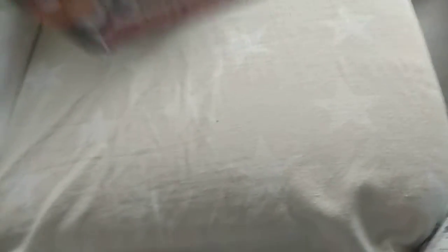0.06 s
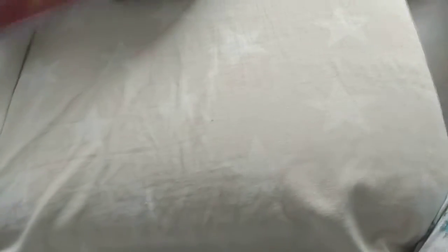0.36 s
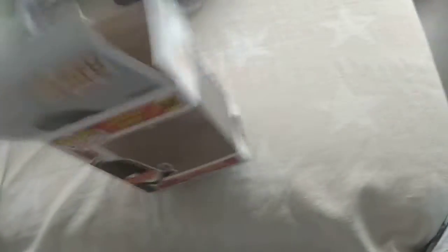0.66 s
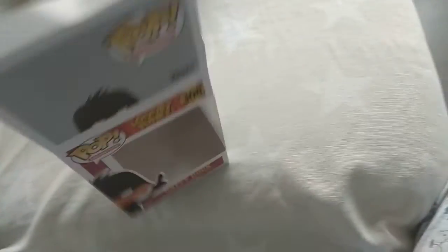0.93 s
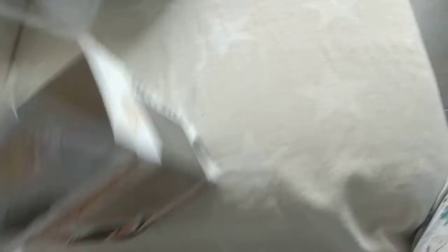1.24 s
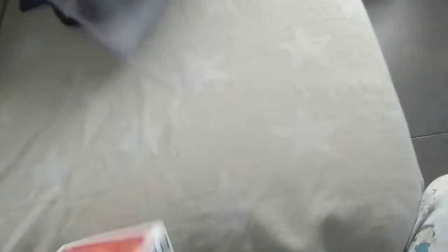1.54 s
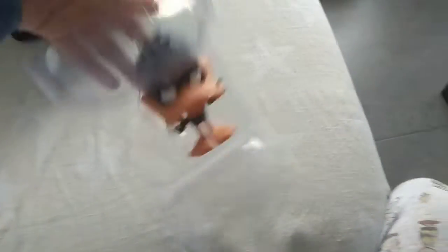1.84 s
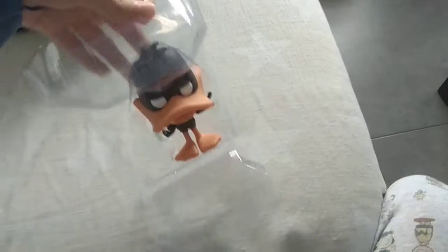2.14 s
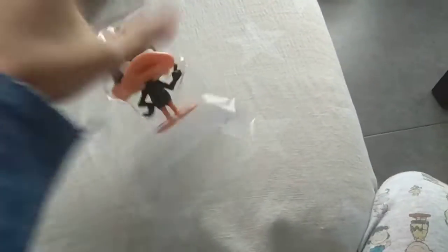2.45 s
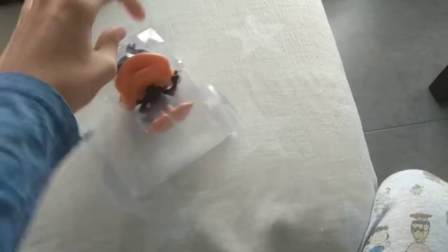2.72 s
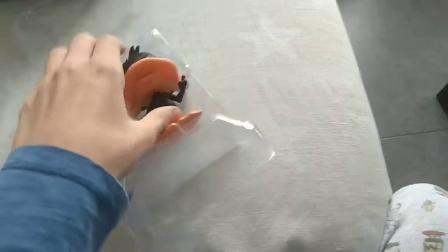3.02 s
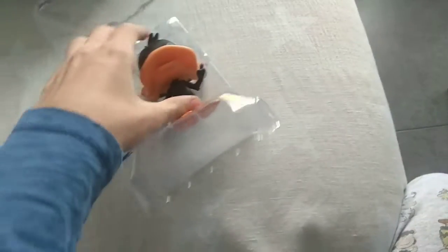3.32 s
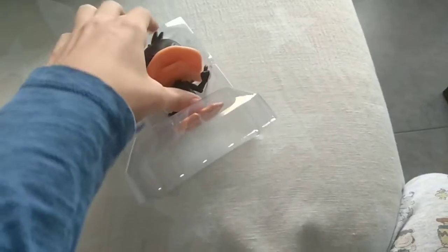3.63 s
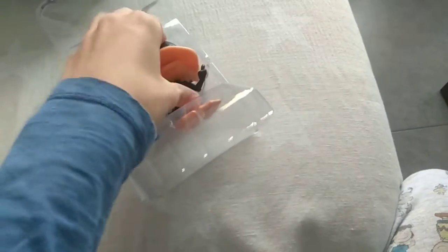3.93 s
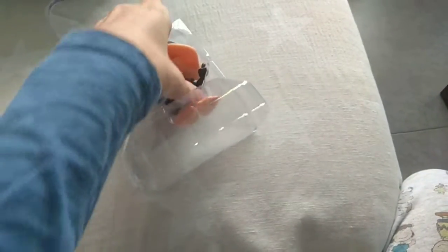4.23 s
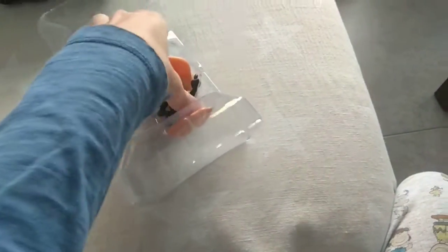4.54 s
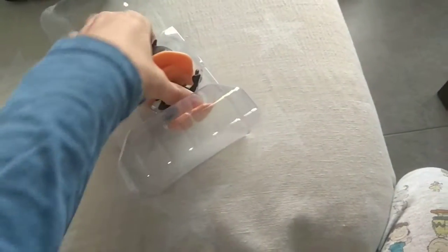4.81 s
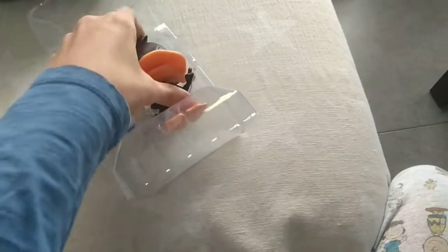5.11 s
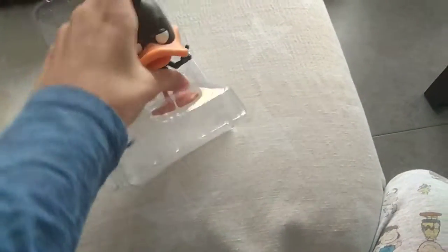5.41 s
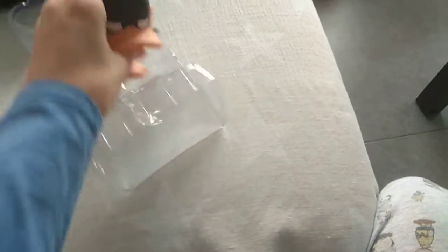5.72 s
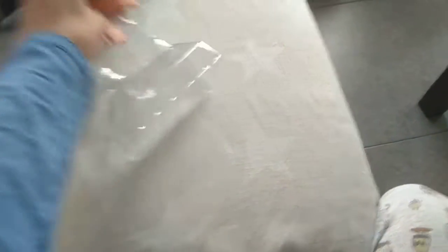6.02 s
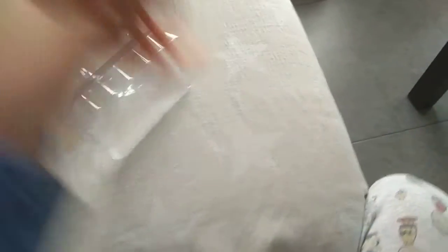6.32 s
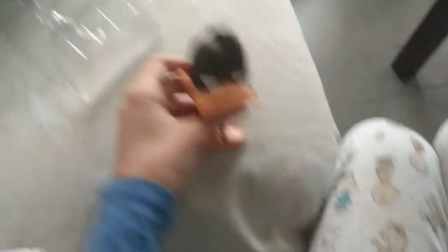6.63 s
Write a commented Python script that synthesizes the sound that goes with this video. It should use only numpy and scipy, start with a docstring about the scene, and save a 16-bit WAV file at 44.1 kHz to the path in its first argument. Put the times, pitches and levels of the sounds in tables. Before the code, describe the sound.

A small cardboard box is handled and opened with a quick run of hollow knocks, scrapes and flap rasps. Its insert slides out with a brief, thin chafing squeak. Then a hand rubs and flexes a thin plastic tray, making quieter crinkles and dry clicks with a few sharp snaps as it works a toy figure loose. The sounds are close, in stereo, in a small quiet room.

```python
"""Knocks, rasps and slides come first: a small cardboard box is opened and its insert chafes out.
Then a hand rubs, flexes and snaps a thin plastic tray while it works a toy figure loose.
Stick-slip friction makes the hiss and the rasps; impacts and buckling excite the damped modes
of panels and shells. A small room answers faintly, and two close microphones hear it in stereo."""
import sys
import numpy as np
from scipy import signal
from scipy.fft import rfft, irfft, next_fast_len
from scipy.io import wavfile
from scipy.ndimage import uniform_filter1d, map_coordinates

SR = 44100
rng = np.random.default_rng(int(sys.argv[2]) if len(sys.argv) > 2 else 0)


def wav_record(signal):
    """Record a signal, one row per channel, as 16-bit PCM in the file named by sys.argv[1]."""
    frames = np.transpose(np.atleast_2d(signal))
    bounded = np.clip(frames, -1, 1)
    # unit amplitude maps onto the largest positive 16-bit level
    quanta = np.round(bounded * 32767).astype(np.int16)
    wavfile.write(sys.argv[1], SR, quanta)


N = 293706
T = np.arange(SR // 4) / SR  # time axis of one short event, in seconds

# Slides on the card. Each row: time of full speed in seconds, body and hiss levels in dB,
# then attack, hold and release in seconds.
CARD_STROKES = [(0.02, -33.5, -46.5, 0.064, 0.018, 0.04), (0.07, -33.5, -41, .05, .01, 0.028),
                (0.14, -32, -37, .12, 0.044, .04), (0.23, -28.5, -35.5, 0.052, 0.04, 0.14),
                (0.3395, -27, -31, .008, 0.025, 0.0704), (0.425, -23, -35.5, 0.015, 0.026, 0.091),
                (0.56, -25, -28.5, 0.061, 0.058, 0.033), (0.609, -24.5, -24, 0.021, 0.065, 0.01),
                (0.7, -31, -37.5, .03, 0.032, 0.029), (0.752, -19, -27.5, 0.016, 0.015, 0.076),
                (0.86, -25, -37, 0.054, 0.019, 0.043), (1.025, -42, -42.5, 0.046, 0.015, 0.055),
                (1.125, -52, -37, 0.015, 0.0051, 0.015), (1.175, -38, -36.5, 0.08, 0.024, 0.042),
                (1.315, -50.5, -57, 0.31, 0.034, 0.047), (1.4, -61, -57.5, 0.029, 0.0059, 0.22)]
# Spectra of the card's sheet, contact, flap edge and rumble. Each row: frequency in Hz, level in dB.
CARD_BODY = [(200, -26), (380, 0), (550, 2), (800, 2), (1050, 5.5), (1300, 0), (1600, -4), (2300, -4.5),
             (3200, -12), (4800, -14), (8000, -35.5)]
CARD_HISS = [(2500, -19), (4800, 2), (6500, 0), (8500, 7), (10500, 2.5), (13000, 1.5), (16000, -14.5)]
CARD_EDGE = [(300, -24), (700, -6.5), (1300, 2.5), (1900, 7), (2600, 3.5), (3600, -5.5), (5000, -10.5),
             (8000, -23)]
BOX_RUMBLE = [(30, -6), (70, -19), (100, -17), (130, -4.5), (190, 5.5), (260, 2.5), (350, 2), (600, -25)]
# Finger knocks. Each row: start in seconds, level in dB, pitch in Hz, relative edge and thump in dB.
KNOCKS = [(0.03, -23, 1090, -20, -12.5), (0.054, -25, 900, -19, -12.5), (0.097, -15.5, 868, -40, -18.5),
          (0.1895, -10.5, 1314, -19.5, -14), (0.228, -10, 696, -20, -18.5), (0.338, -19.5, 684, -8, -10),
          (0.353, -19, 412, -25, 1), (0.3575, -11.5, 1230, -8.5, -9.5), (0.4165, -18, 620, -13.5, -16.5),
          (0.423, -14, 500, -26, -9), (0.441, -15.5, 480, -16.5, -10.5), (0.4525, -12, 875, -16, -5.5),
          (0.5135, -12, 1430, -24.5, -15.5), (0.5985, -5.5, 2000, -21.5, -20),
          (0.6803, -5.5, 1760, -14, -14.5), (0.6845, -10, 1308, -17.5, -12.5), (0.731, -16.5, 750, -16, -2),
          (0.772, -15, 760, -25, -11), (0.8597, -10, 1790, -5, -13.5), (0.9095, -20, 1330, -7.5, -19.5),
          (0.916, -12, 1290, -6, -26.5), (1.05, -34.5, 1030, -24, -22), (1.071, -22, 2060, -16, -36.5),
          (1.083, -27, 2120, -8.5, -31.5), (1.114, -27, 2260, -21.5, -41), (1.31, -33, 745, -4, -28),
          (1.332, -32.5, 740, -28, -24), (1.3627, -30, 1790, 0, -8), (1.367, -35.5, 2320, -18, -9),
          (1.441, -34.5, 1730, -19, -13)]
# Modes of the box. Each row: frequency in Hz, level in dB, 60 dB decay time in seconds.
BOX_MODES = [(127, -2.5, 0.11), (173.83, 0.5, 0.13), (251, 4.5, 0.098), (304, 5, 0.071), (500, -2.5, 0.051),
             (609, -8.5, 0.043)]
# The flap catching. Each row: start in seconds, level in dB, relative hiss in dB, length in seconds.
FLAP_RASPS = [(0.019, -25.5, -7.5, .003), (0.025, -27.5, -1.5, 0.0077), (0.174, -19.5, -15, 0.0057),
              (0.2235, -8.5, -20, 0.012), (0.2515, -26, 9, 0.0053), (0.358, -4, -18.5, 0.0027),
              (0.4163, -15, 2.5, 0.0043), (0.4222, -18, 5, 0.003), (0.44, -16.5, -4.5, .003),
              (0.604, -15.5, 0.5, 0.0061), (0.636, -18.5, 1.5, 0.0066), (0.659, -15, -1, 0.0071),
              (0.749, -9.5, -1.5, 0.0034), (0.754, -9.5, -0.5, 0.0049), (0.7635, -11.5, 2.5, 0.0092),
              (0.7847, -10, -0.5, 0.0065), (0.816, -22, 3, 0.0086), (0.8624, -13.5, 1, 0.00285),
              (0.8715, -6.5, -5.5, 0.00784), (0.8815, -9, -1, 0.0139), (0.909, -10, -2, 0.0064),
              (0.9162, -6, 0, 0.00575), (1.215, -20.5, -9, 0.0067)]
# The box lies to the right. Each row: frequency in Hz, left minus right in dB.
BOX_BALANCE = [(100, -4.5), (500, -4), (1200, -2), (2400, -0.5), (5000, -2.5), (9000, -3), (15000, -2.5)]

def box():
    """Friction and impact drive a cardboard shell: slides, knocks, a rasping flap, a chafing insert."""
    slides = rubbing(CARD_STROKES, CARD_BODY, CARD_HISS, body_db=1.5, hiss_db=-0.5,
                     grain_db=3.5, modes_db=3, judder_db=3, judder_rate=180)
    knocks = blows(KNOCKS, BOX_MODES, CARD_BODY, CARD_HISS, delay_s=0.0007, hardening=0.21,
                   panel_db=-5.5, panel_cycles=19, flutter=0.73, flutter_t60=0.079,
                   clack_db=-3, clack_t60=0.028, crack_db=-6, crack_t60=0.015,
                   click_db=-9, wall_db=-12.5, thump_db=-4)
    slides += fizz()
    flap = rasps(FLAP_RASPS, CARD_EDGE, CARD_HISS, body_db=-10, hiss_db=-5.5, wall_db=5,
                 rise_s=0.0007, grain_db=2.5)
    chafe = insert()
    bed = slow_fade(start_s=0, end_s=1.45, fall_db_per_s=4.5)
    rumble = sway(CARD_STROKES, bed, BOX_RUMBLE, rub_db=-8.5, bed_db=-54, modes_db=1)
    return delayed(tilted(slides + knocks + chafe + rumble + flap, BOX_BALANCE), lag_s=0.0003)

# The insert leaving the box. Each row: time in seconds, level in dB, pitch in Hz.
INSERT_PATH = [(0.93, -39.5, 1930), (0.948, -49.5, 1940), (1.028, -47.5, 2076), (1.081, -35, 2180),
               (1.095, -48, 2250), (1.125, -33.5, 2400), (1.149, -40, 2316), (1.215, -28.5, 2297),
               (1.245, -71, 2193)]
# Spectrum of its chafing. Each row: frequency in Hz, level in dB.
INSERT_SPECTRUM = [(1200, -36), (1750, -3.5), (2000, -7), (2280, 0), (2480, -9.5), (2750, -6),
                   (3200, -15.5), (4500, -23.5)]

def insert(chafe_db=-0.5, sing_db=-5.5, width_hz=520):
    """Stick-slip on the box wall excites a narrow resonance that shifts as the insert slides."""
    times, _, pitch = np.transpose(INSERT_PATH)
    phase = 2 * np.pi * np.cumsum(np.interp(np.arange(N) / SR, times, pitch)) / SR
    sing = unit(wobble(width_hz) * np.cos(phase) + wobble(width_hz) * np.sin(phase))
    chafe = noise(INSERT_SPECTRUM, N, modes_db=6.5)
    judder = unit(amp(2.9 * wobble(140)))
    return level(INSERT_PATH) * judder * (amp(chafe_db) * chafe + amp(sing_db) * sing)

# Spectrum of a fast slide. Each row: frequency in Hz, level in dB.
CARD_FIZZ = [(5000, -35.5), (8000, -4), (10500, 5.5), (15000, 2), (16000, -15)]

def fizz(fizz_db=-20):
    """Friction noise brightens with sliding speed: the top treble grows as its square."""
    speed = stroke_gain(CARD_STROKES, column=2)
    return amp(fizz_db) * (speed / speed.max()) ** 2 * noise(CARD_FIZZ, N, grain_db=2, modes_db=2)

# Skin and figure sliding on the tray. Each row: time of full speed in seconds, body and hiss
# levels in dB, then attack, hold and release in seconds.
TRAY_STROKES = [(1.45, -69, -56, .1, 0.14, .1), (1.635, -49.5, -43, 0.0214, 0.015, 0.02),
                (1.715, -54.5, -47, 0.09, 0.051, 0.019), (1.998, -49.5, -44, 0.018, 0.015, 0.21),
                (2.338, -49.5, -42.5, 0.045, 0.0203, 0.04), (2.478, -36, -38, 0.026, 0.0155, 0.086),
                (2.54, -51, -48, .04, 0.078, 0.35), (2.665, -34, -33, 0.019, 0.0112, 0.072),
                (2.74, -41.5, -34.5, 0.047, 0.0045, 0.062), (2.845, -37, -33.5, 0.025, 0.016, 0.079),
                (3.115, -60, -50, 0.081, .012, 0.11), (3.19, -50.5, -47, 0.12, 0.08, 0.045),
                (3.405, -49.5, -44.5, 0.025, 0.0078, 0.036), (3.475, -50.5, -45.5, 0.087, 0.019, 0.0255),
                (3.595, -47.5, -44.5, 0.07, 0.067, 0.087), (3.75, -48.5, -47.5, 0.091, 0.019, 0.087),
                (3.937, -53.5, -45.5, 0.025, 0.012, 0.037), (3.985, -55, -47, 0.049, 0.0081, .05),
                (4.06, -57.5, -53, 0.112, 0.0296, .1), (4.165, -50, -44.5, 0.091, 0.016, 0.071),
                (4.34, -53.5, -52, 0.031, 0.0085, 0.058), (4.495, -66.5, -61, 0.027, 0.017, 0.115),
                (4.65, -71, -81, 0.044, 0.0364, .05), (4.79, -65, -65, .05, 0.025, 0.09),
                (4.91, -63.5, -67.5, 0.023, 0.018, 0.071), (4.728, -51, -45.5, 0.012, 0.0124, 0.055),
                (4.985, -53, -48.5, 0.037, 0.01, 0.071), (5.245, -49, -60.5, 0.022, 0.0054, 0.083),
                (5.39, -39.5, -36.5, 0.187, 0.045, 0.093), (5.565, -45.5, -42, 0.061, 0.0094, 0.055),
                (5.705, -46.5, -46.5, 0.075, 0.02, 0.106), (5.85, -41, -35.5, 0.0437, 0.0688, 0.055),
                (6.02, -43.5, -41, 0.037, 0.06, 0.1275)]
# Spectra of the tray's sheet, contact and rumble. Each row: frequency in Hz, level in dB.
TRAY_BODY = [(70, -38), (200, -24), (380, -7), (530, -6.5), (700, 2.5), (1000, 0), (1400, 2.5), (1900, 1.5),
             (2600, -2.5), (3400, -7.5), (4800, -16), (8000, -59)]
TRAY_HISS = [(2500, -6), (4800, -3.5), (6500, -3), (8500, 1), (11500, 3), (13500, -3.5), (16000, -7)]
TRAY_RUMBLE = [(30, -8), (80, -40.5), (120, -5.5), (170, 2.5), (215, 0.5), (275, -3), (380, 0.5),
               (600, -29)]
# Buckles and taps. Each row: start in seconds, level in dB, pitch in Hz, relative edge and thump in dB.
SNAPS = [(1.627, -42, 1360, 3.5, -5), (1.649, -35, 649, -3, -6), (1.708, -31.5, 510, -18, -3.5),
         (1.737, -39, 1200, -3, -1), (1.756, -35.5, 776, 0, -13), (1.799, -34.5, 528, -36, -14),
         (1.993, -31, 2000, -11.5, -6), (2.029, -36, 1130, 0, -5.5), (2.087, -48.5, 1610, 7, -6),
         (2.262, -32.5, 1040, -16, -22), (2.275, -40.5, 1000, -14, -32), (2.388, -22.5, 1300, -2.5, -11.5),
         (2.4555, -25.5, 1610, -9.5, -5), (2.4892, -12.5, 1400, -10.5, -10.5),
         (2.491, -12, 1840, -15, -24.5), (2.614, -29.5, 1800, -18, -32), (2.6635, -35, 988, 0, 0.5),
         (2.683, -29.5, 960, -22, -4.5), (2.841, -25, 1020, -9.5, -5.5), (2.923, -47.5, 1710, 0.5, -11),
         (3.0275, -33.5, 1530, -6, -10.5), (3.0823, -11, 950, -17, -21), (3.1142, -42, 1150, 5, -4),
         (3.228, -28, 755, -22, -7), (3.523, -41, 1370, -11, -22), (3.761, -39.5, 960, -5, -4),
         (3.778, -35.5, 980, -6, -13), (3.859, -32.5, 1390, -7, -37.5), (3.937, -41, 1200, -21, -2),
         (3.959, -49, 686, -9, 8), (4.061, -37.5, 1090, -7, -16), (4.309, -39, 730, -24, -9.5),
         (4.335, -41, 820, -14, -6), (4.491, -42, 1320, -34, -5.5), (4.552, -46, 773, -10.5, -25.5),
         (4.648, -41, 790, -32.5, -29), (4.692, -43.5, 814, -33, -17.5), (4.727, -35.5, 903, -19.5, -10.5),
         (4.796, -42.5, 780, -20, -9), (4.91, -37.5, 849, -21, -31), (4.9797, -35, 1260, -0.5, -21),
         (4.9962, -36.5, 1490, -6, -28), (4.9982, -36.5, 930, -3.5, -21), (5.186, -44.5, 900, -28, -4.5),
         (5.229, -35.5, 1310, -11, -9), (5.257, -36.5, 564, -20, -4), (5.359, -26.5, 850, -20, -10),
         (5.368, -31.5, 1400, -16, -22.5), (5.726, -34, 1890, -20, -7.5), (5.757, -42.5, 710, -17, 6),
         (5.767, -35, 1250, -14, -14.5), (5.8285, -22, 990, -20, -10), (5.834, -25.5, 1380, -11, -22),
         (6.069, -29, 1370, -26, -19), (6.078, -29.5, 860, -27, -11), (6.346, -42.5, 1075, -32, -10.5)]
# Crumpling. Each row: start in seconds, level in dB, relative hiss in dB, length in seconds.
CRUNCHES = [(2.362, -38.5, 10, 0.0038), (2.462, -32, 2, 0.0037), (2.467, -36, -1, 0.0088),
            (2.4765, -24.5, 3, 0.0056), (2.482, -48, 0, 0.0027), (2.488, -24.5, -3, 0.0096),
            (2.512, -25, -10, 0.0064), (2.519, -36.5, 4.5, 0.0054), (2.663, -40.5, 9.5, .008),
            (2.748, -42, 10.5, 0.0081), (2.846, -33, 5, 0.0066), (2.859, -39.5, 5, 0.012),
            (5.243, -41.5, 4.5, .004), (5.458, -44, 9, .004)]
# Modes of the tray and of the hollow round the figure.
# Each row: frequency in Hz, level in dB, 60 dB decay time in seconds.
TRAY_MODES = [(150.6, -2, 0.1), (202.8, -1, 0.086), (275.8, 5.5, 0.059), (345, 6, 0.02), (411.6, -1.5, 0.1)]
POCKET_MODES = [(996, 1.5, 0.022), (1290, -17, 0.055), (3769, 5.5, 0.031), (8710, -6.5, .012),
                (12030, -7.5, .012)]

def tray():
    """A thin plastic shell buckles in dry snaps, while friction excites its moulded hollow."""
    rubs = crinkle()
    rubs += rubbing(TRAY_STROKES, TRAY_BODY, TRAY_HISS, body_db=0, hiss_db=-3.5,
                    grain_db=4, modes_db=3.5, judder_db=2, judder_rate=220)
    snaps = blows(SNAPS, TRAY_MODES, TRAY_BODY, TRAY_HISS, delay_s=0.0008, hardening=0.34,
                  panel_db=-7, panel_cycles=6.5, flutter=0.33, flutter_t60=0.1,
                  clack_db=-8.5, clack_t60=0.011, crack_db=-2, crack_t60=0.009,
                  click_db=-6, wall_db=-14, thump_db=-3.5)
    span_s = (1.5, 6.2)
    hush = rustle(slow_fade(*span_s, fall_db_per_s=2))
    crunch = rasps(CRUNCHES, TRAY_BODY, TRAY_HISS, body_db=-4.5, hiss_db=-2.5, wall_db=10,
                   rise_s=0.0008, grain_db=1.5)
    bed = slow_fade(*span_s, fall_db_per_s=1.55)
    rumble = sway(TRAY_STROKES, bed, TRAY_RUMBLE, rub_db=-10, bed_db=-63.5, modes_db=3)
    pocket = resonate(rubs, POCKET_MODES, ring_db=-1)
    return delayed(pocket + snaps + crunch + hush + rumble, lag_s=0.00016)

def crinkle(dents_per_s=220, crinkle_db=4, spread_db=2.8, ring_cycles=9.7, tick_share=0.31):
    """Local buckling: under each stroke small dents flip at random, each with a ring and a tick."""
    track = np.zeros((2, N))
    tick = crest(noise(TRAY_HISS, len(T), grain_db=2.5) * fade(0.002))
    for when, pitch, size in rng.random((int(dents_per_s * N / SR), 3)):
        hz = 700 * 2 ** (2 * pitch)
        dent = np.sin(2 * np.pi * hz * T) * fade(ring_cycles / hz) * (1 - np.exp(-hz * T))
        gain = amp(spread_db * (min(-np.log(size), 3) - 1))
        add(track, when * N / SR, gain * (dent + tick_share * tick)[:, :600])
    return amp(crinkle_db) * stroke_gain(TRAY_STROKES, column=1) * track

# Spectrum of the stiff corners. Each row: frequency in Hz, level in dB.
CORNER_CLACK = [(1200, -9), (2200, 4), (3000, 2), (4000, 0), (5000, -22), (7500, -24.5)]
# Modes of a crease letting go and of the stiff plastic wall.
# Each row: frequency in Hz, level in dB, 60 dB decay time in seconds.
CREASE_MODES = [(1640, 0.5, 0.01), (4030, 3.5, 0.012), (5750, -3.5, .008), (8300, 2, .005)]
WALL_MODES = [(1269, 2, 0.13), (1356, -4, 0.044), (1796.4, 0.5, 0.038), (2240, -11.5, 0.052),
              (2425, -7.5, 0.07), (3250, -3, 0.16), (3600, -4.5, .06), (3890, -4, 0.054)]

def blows(table, modes, body, hiss, delay_s, hardening, panel_db, panel_cycles, flutter, flutter_t60,
          clack_db, clack_t60, crack_db, crack_t60, click_db, wall_db, thump_db):
    """Impulsive excitation: each blow sets panel, crease, corners, wall and shell in damped vibration."""
    track = np.zeros((2, N))
    mean_db = np.mean(table, axis=0)[1]
    for start, db, hz, edge_rel, thump_rel in table:
        flip = crest(np.sin(2 * np.pi * hz * T) * fade(panel_cycles / hz) * (1 - np.exp(-2 * hz * T)))
        panel = crest(flip + flutter * burst(body, flutter_t60))  # spreads into dense modes
        crack = amp(crack_db - hardening * (db - mean_db) / 2) * burst(hiss, crack_t60)
        click = amp(click_db) * ring(CREASE_MODES, scatter_db=2, detune=0.099)
        clack = amp(clack_db) * burst(CORNER_CLACK, clack_t60)
        wall = amp(wall_db) * ring(WALL_MODES, scatter_db=1.5, detune=0.012)
        force = amp(hardening * (db - mean_db))  # harder blows reach the corners and the wall
        edge = amp(edge_rel) * (crack + click + force * (clack + wall))
        inertia = 1 - np.exp(-T / 0.0043)  # the heavy shell takes a moment to get going
        shell = crest(ring(modes, scatter_db=0, detune=0.066) * inertia)
        blow = amp(panel_db) * panel + edge + amp(thump_rel + thump_db) * shell
        add(track, start + delay_s, amp(db) * blow)  # sounds just after its listed time
    return track

def rasps(table, body, hiss, body_db, hiss_db, wall_db, rise_s, grain_db):
    """Stick-slip in dense bursts: a dragging edge or crease rings the plastic wall."""
    track = np.zeros((2, N))
    for start, db, hiss_rel, length in table:
        drag = (1 - np.exp(-T / rise_s)) * np.exp(-(T / length) ** 2)
        sheet = amp(body_db) * crest(drag * noise(body, len(T), grain_db, modes_db=5))
        contact = amp(hiss_rel + hiss_db) * crest(drag * noise(hiss, len(T), grain_db, modes_db=5))
        add(track, start, amp(db) * (sheet + contact))
    return resonate(track, WALL_MODES, wall_db)

def rubbing(strokes, body, hiss, body_db, hiss_db, grain_db, modes_db, judder_db, judder_rate):
    """Sliding friction: tiny slips under a juddering grip hiss at the contact and shake the sheet."""
    press, speed = stroke_gain(strokes, column=1), stroke_gain(strokes, column=2)
    judder = judder_db * wobble(judder_rate)
    sheet = amp(body_db) * press * unit(amp(judder)) * noise(body, N, grain_db, modes_db)
    contact = amp(hiss_db) * speed * unit(amp(judder / 2)) * noise(hiss, N, grain_db / 2, modes_db)
    return sheet + contact

def rustle(envelope, rustle_db=-65, hiss_db=-61):
    """Amplitude-modulated noise: a faint steady hiss and rustle that slowly fades."""
    gain = envelope * amp(0.67 * wobble(8.7))
    grains = amp(rustle_db) * unit(amp(3.9 * wobble(60))) * noise(TRAY_BODY, N, grain_db=5.5)
    return gain * (grains + amp(hiss_db) * noise(TRAY_HISS, N, grain_db=3))

def sway(strokes, bed, spectrum, rub_db, bed_db, modes_db, lumps_db=5):
    """Forced vibration: hollow packaging rumbles under each stroke, over a faint fading bed."""
    drive = amp(rub_db) * stroke_gain(strokes, column=1) + amp(bed_db) * bed
    return drive * unit(amp(lumps_db * wobble(30))) * noise(spectrum, N, modes_db=modes_db)

# The small room. Each row: frequency in Hz, reverberation time in seconds.
ROOM_T60 = [(150, 0.81), (700, 0.29), (2000, 0.32), (6000, 0.23), (14000, 0.16)]

def room(x):
    """Diffuse reverberation: a noise tail decays exponentially, the treble first."""
    hz, t, white = signal.stft(rng.standard_normal((2, SR // 2)), SR, nperseg=256)
    decay = amp(-60 * t / along(ROOM_T60, hz)[:, None])
    tail = signal.istft(white * decay, SR, nperseg=256)[1]
    tail = np.pad(tail / np.linalg.norm(tail[0]), ((0, 0), (200, 0)))
    return signal.fftconvolve(x, tail, axes=1)[:, :N]

# Likeness of the two channels. Each row: frequency in Hz, correlation coefficient.
COHERENCE = [(100, 1), (600, 0.94), (1400, 0.32), (3000, 0.31), (8000, 0.029), (15000, .35)]

def noise(spectrum, n, grain_db=0, modes_db=0):
    """Partly coherent stereo noise of rms 1; grain_db brings out single slips, modes_db resonances."""
    sizes = np.repeat(amp(grain_db * rng.standard_normal(n // 16 + 1)), 16)[:n]
    slips = sizes * rng.standard_normal((2, n))
    if modes_db:
        slips = shifting_modes(slips, modes_db)
    def response(hz):
        angle = np.arccos(np.clip(along(COHERENCE, hz), -1, 1)) / 2
        return amp(along(spectrum, hz)) * [np.cos(angle), np.sin(angle)]
    mid, side = filtered(slips, response)
    return unit(np.array([mid + side, mid - side]))

def shifting_modes(x, depth_db):
    """A flexed sheet has dense narrow resonances that wander as the grip changes."""
    spectra = signal.stft(x, nperseg=1024)[2]
    field = uniform_filter1d(rng.standard_normal(spectra.shape[1:]), size=3, axis=0)
    field = uniform_filter1d(field, size=7, axis=1)
    return signal.istft(spectra * amp(depth_db * unit(field)), nperseg=1024)[1][:, :x.shape[1]]

def burst(spectrum, t60, rise_s=0.0005):
    """Dense damped modes merge into a decaying burst of noise."""
    grains = noise(spectrum, len(T), grain_db=2.5, modes_db=2)
    return crest(grains * fade(t60) * (1 - np.exp(-T / rise_s)))

def ring(modes, scatter_db, detune):
    """Free vibration is a sum of damped modes, struck a little differently each time."""
    total = np.zeros(len(T))
    for hz, db, t60 in modes:
        polarity, strength, shift = rng.standard_normal(3)
        tone = np.sin(2 * np.pi * hz * (1 + detune * shift) * T)
        total += np.sign(polarity) * amp(db + scatter_db * strength) * tone * fade(t60)
    return crest(total)

def resonate(x, modes, ring_db):
    """Resonance: driven modes colour a sound and ring on after it."""
    def peak(f, hz, t60):
        damping = 1j * f * np.log(1000) / (np.pi * t60)
        return damping / (hz ** 2 - f ** 2 + damping)
    return filtered(x, lambda f: 1 + sum(amp(ring_db + db) * peak(f, hz, t60) for hz, db, t60 in modes))

def stroke_gain(strokes, column, depth_db=21.5):
    """Incoherent strokes add in power; each moves by depth_db over its attack and its release."""
    t, power = np.arange(N) / SR, np.zeros(N)
    for row in strokes:
        peak_s, _, _, attack, hold, release = row
        away = np.maximum(peak_s - t, 0) / attack + np.maximum(t - peak_s - hold, 0) / release
        power += amp(row[column] - depth_db * away) ** 2
    return np.sqrt(power)

def slow_fade(start_s, end_s, fall_db_per_s):
    """A gain that falls evenly in dB from start to end."""
    return level([(start_s, 0), (end_s, -fall_db_per_s * (end_s - start_s))])

def level(rows):
    """Smooth gain through rows of seconds and dB; silent outside them."""
    times, db = np.transpose(rows)[:2]
    gain = amp(np.interp(np.arange(N) / SR, times, db, left=-200, right=-200))
    return uniform_filter1d(gain, size=160)

def delayed(x, lag_s):
    """Time difference of arrival: the right channel leads the left by lag_s."""
    return filtered(x, lambda hz: np.exp(-1j * np.pi * np.outer([lag_s, -lag_s], hz)))

def tilted(x, balance):
    """A left-right level difference by frequency."""
    return filtered(x, lambda hz: amp(np.outer([.5, -.5], along(balance, hz))))

def filtered(x, response):
    """Linear filtering multiplies the spectrum by a response."""
    n = x.shape[-1]
    size = next_fast_len(n + 4096)
    return irfft(rfft(x, size) * response(np.fft.rfftfreq(size, 1 / SR)), size)[..., :n]

def wobble(rate):
    """A smooth random curve, rate knots a second."""
    return map_coordinates(rng.standard_normal(int(N * rate / SR) + 4), [np.arange(N) * rate / SR])

def along(points, hz):
    """A curve read on a log frequency axis."""
    knots, values = np.transpose(points)
    return np.interp(np.log(hz + 1), np.log(knots + 1), values)

def add(track, start_s, sound):
    """Superpose a sound on the track."""
    part = track[:, max(round(start_s * SR), 0):][:, :sound.shape[1]]
    part += sound[:, :part.shape[1]]

def fade(t60):
    """Exponential decay, 60 dB in t60 seconds."""
    return np.exp(-np.log(1000) * T / t60)

def crest(x):
    """Scaled so that the loudest 3 ms have rms 1."""
    power = np.mean(np.atleast_2d(x) ** 2, axis=0)
    return x / np.sqrt(uniform_filter1d(power, size=132, mode="constant").max())

def unit(x):
    """Scaled to rms 1."""
    return x / np.sqrt(np.mean(x ** 2) + 1e-20)

def amp(db):
    """Decibels to gain."""
    return 10 ** (np.asarray(db) / 20)

# Room tone and microphone hiss. Each row: frequency in Hz, level in dB.
NOISE_FLOOR = [(40, -51), (100, -15), (170, -5), (350, 2.5), (700, -9.5), (1100, -15), (2800, -26.5),
               (7000, -34), (10000, -16.5), (12500, -15), (14500, -6.5), (16000, -20.5)]

def scene():
    """Superposition of direct sound, reverberation and a quiet noise floor."""
    direct = box() + tray()
    return direct + amp(-12.5) * room(direct) + amp(-63) * noise(NOISE_FLOOR, N)

# The two microphones. Each row: frequency in Hz, left minus right in dB.
MIC_BALANCE = [(100, -1.5), (400, 1.5), (700, -2.5), (1300, 3), (2400, 5), (4400, 0.5), (7500, -3.5),
               (10000, 1.5), (12500, 11), (15000, 16)]

def record(dry, low_hz=75, top_hz=16100):
    """Band limiting cuts deep bass and extreme treble; the left microphone is the brighter."""
    bass_cut = signal.butter(2, low_hz, "highpass", fs=SR, output="sos")
    heard = signal.sosfilt(bass_cut, tilted(dry, MIC_BALANCE))
    return filtered(heard, lambda hz: 1 / (1 + (hz / top_hz) ** 160))

dry = scene()
out = record(dry)
wav_record(out)
```